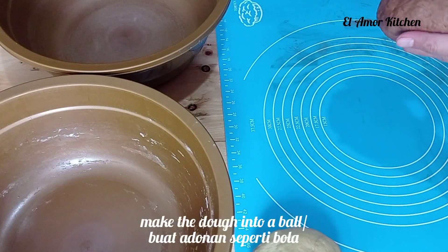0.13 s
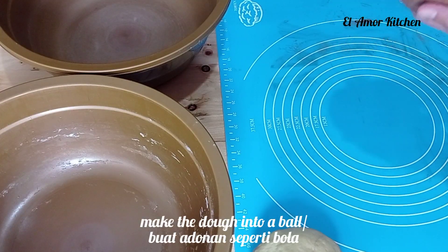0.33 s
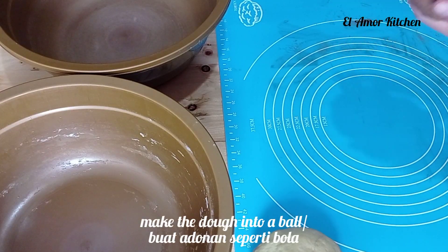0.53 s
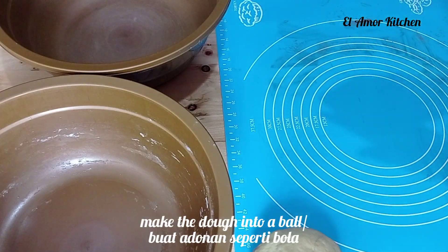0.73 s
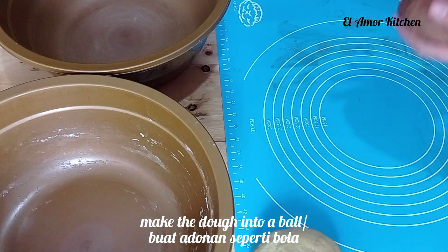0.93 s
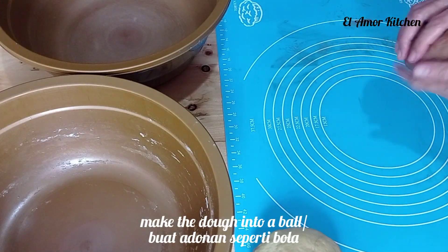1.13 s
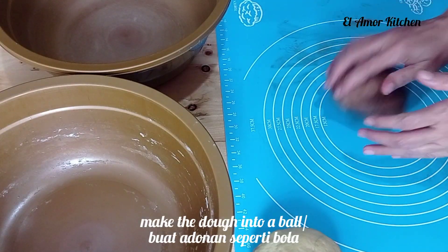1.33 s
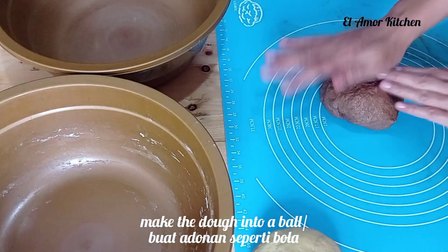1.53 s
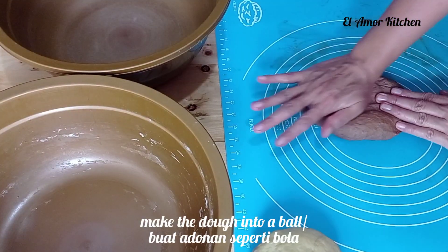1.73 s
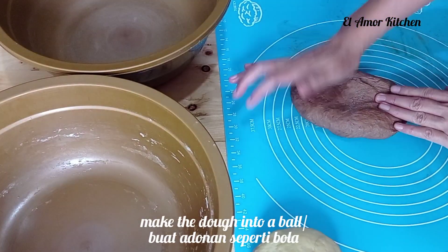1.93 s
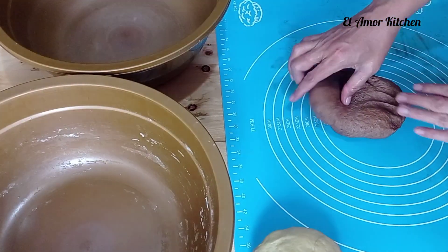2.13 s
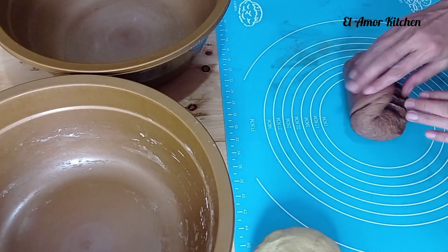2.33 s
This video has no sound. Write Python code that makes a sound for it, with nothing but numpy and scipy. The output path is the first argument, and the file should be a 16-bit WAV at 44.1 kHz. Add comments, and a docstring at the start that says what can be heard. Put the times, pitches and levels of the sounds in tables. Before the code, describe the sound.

Soft dough thuds onto a mat on a wooden table. Two small hand pats come first, and soft bumps and palm rubs follow, all heard from nearby in a slightly echoing kitchen with a faint appliance hum.

```python
"""A bare kitchen, where an appliance hums quietly. A ball of soft dough is patted twice between the hands,
dropped on a silicone mat on a wooden table, then pressed and folded. Impact makes the dough's wet skin
slap and sets the table thudding in its damped modes; friction of the palms gives hiss, crackle and
small squeaks. The room reverberates after the pats, the strokes and the drop."""
import sys
import numpy as np
from scipy import signal
from scipy.fft import rfft, irfft, next_fast_len
from scipy.io import wavfile
from scipy.ndimage import map_coordinates

SR = 44100
rng = np.random.default_rng(int(sys.argv[2]) if len(sys.argv) > 2 else 0)


def materialize(psi):
    """Save the field psi as 16-bit PCM at rate SR to the path in sys.argv[1].

    A 1-D psi becomes a single channel; in a 2-D psi each row is a channel.
    """
    bounded = np.clip(np.atleast_2d(psi).T, -1, 1)
    quanta = np.round(bounded * 32767).astype(np.int16)
    wavfile.write(sys.argv[1], SR, quanta)


N = 108794
T = np.arange(N) / SR


def amp(db):
    """Amplitude ratio of a level in decibels."""
    return 10 ** (np.asarray(db) / 20)


def unit(x):
    """Normalisation to rms 1."""
    return x / np.sqrt(np.mean(x ** 2) + 1e-20)


def along(points, hz):
    """Interpolation of (f, value) points on a log frequency axis."""
    f, values = np.transpose(points)
    return np.interp(np.log(hz + 1), np.log(f + 1), values)


def wobble(rate):
    """Smooth random modulation: a spline through rate knots a second."""
    return map_coordinates(rng.standard_normal(int(N * rate / SR) + 4), [T * rate])


def filtered(x, response):
    """Linear filtering: the spectrum of x times a frequency response."""
    size = next_fast_len(N + SR // 2)
    return irfft(rfft(x, size) * response(np.fft.rfftfreq(size, 1 / SR)), size)[:N]


def noise(spectrum):
    """Spectral shaping: coloured noise of rms 1."""
    return unit(filtered(rng.standard_normal(N), lambda hz: amp(along(spectrum, hz))))


def narrowband(hz, width):
    """Quadrature modulation: a noise band about hz, roughly width Hz wide."""
    return wobble(width) * np.sin(2 * np.pi * hz * T) + wobble(width) * np.cos(2 * np.pi * hz * T)


def burst(onset, rise, fall):
    """Exponential attack and decay, with time constants in seconds."""
    t = np.maximum(T - onset, 0)
    return (1 - np.exp(-t / rise)) * np.exp(-t / fall)


def swell(peak, rise, fall):
    """Gaussian envelope with its own width on each side of the peak."""
    return np.exp(-.5 * ((T - peak) / np.where(T < peak, rise, fall)) ** 2)


# Hum lines of the appliance: f/Hz, rms level/dB, modulation depth
HUM_LINES = [(147.2, -66.5, 0.27), (247, -84.5, 0.49), (494.7, -73.5, 0.44), (580, -89.5, 0.22)]
# Spectrum of the room's air: f/Hz, relative level/dB
AIR_SPECTRUM = [(15, -71), (25, -30), (91, -7), (119, -5.5), (160, -2), (340, -9), (399, -16.5), (495, -10),
                (552, -16.5), (1020, -28.5), (2420, -33), (2630, -35), (2850, -34.5), (3530, -40),
                (15500, -52.5)]

def background():
    """Random amplitude and phase modulation makes the hum waver over a broadband murmur of air."""
    hum = 0
    for hz, db, depth in HUM_LINES:
        modulation = 1 + depth * (wobble(22.16) + 1j * wobble(22))
        carrier = np.exp(2j * np.pi * (hz * T + rng.random()))
        hum += amp(db) * np.sqrt(2) * np.real(modulation * carrier)
    return hum + amp(-66.5 + 0.64 * wobble(10.54)) * noise(AIR_SPECTRUM)


# Contacts of hand and dough: t/s, level/dB, decay time/s, palm weight/dB
PAT_CONTACTS = [(.022, -60.5, 0.0016, 0), (0.911, -54, 0.0058, -19), (0.921, -44, 0.003, 4.5),
                (0.924, -37.5, .004, -7.5), (1.1106, -48, 0.0054, -23), (1.113, -38.5, 0.0024, -18),
                (1.129, -49, 0.0039, -10)]
# Spectra of the skin's smack and the cupped palm: f/Hz, relative level/dB
SMACK_SPECTRUM = [(40, -38), (150, -36), (500, 0.5), (900, -7), (1600, -2.5), (2300, -5), (2900, -4),
                  (4400, -0.5), (6800, -2), (9000, -7.5), (11000, -20.5), (13500, -29), (15500, -18)]
PALM_SPECTRUM = [(40, -45), (100, -18), (250, -11.5), (370, 2.5), (470, 6.5), (600, -11.5), (900, -15.5),
                 (4000, -53)]

def pats():
    """Impact of skin on dough gives a short smack; cavity resonance of the palm adds a hollow note."""
    smack_power = sum((amp(db) * burst(s, 0.00059, decay)) ** 2 for s, db, decay, _ in PAT_CONTACTS)
    hollow = sum(amp(db + palm_db) * burst(s, 0.0019, 0.0047) for s, db, _, palm_db in PAT_CONTACTS)
    smack = contact(np.sqrt(smack_power), SMACK_SPECTRUM, wet_db=-1.5, build_s=.002)
    return smack + contact(amp(-1.5) * hollow, PALM_SPECTRUM, wet_db=2.0, build_s=.004)


def contact(envelope, spectrum, wet_db, build_s):
    """Superposition of a contact's direct noise and its reverberant field."""
    return envelope * noise(spectrum) + kitchen(envelope, spectrum, wet_db, build_s)


# Reverberation time of the kitchen: f/Hz, T60/s
KITCHEN_T60 = [(100, 0.63), (250, 0.94), (1000, 0.75), (4000, 0.54), (7000, 0.49), (10000, .45),
               (15000, 0.43)]
RIPPLE_DB, RIPPLE_HZ = 2.5, 70  # depth and spacing of the colour from crowded room modes

def kitchen(envelope, spectrum, wet_db, build_s):
    """Reverberation: diffuse energy builds up, then decays exponentially at each frequency's own rate."""
    ripple_db = RIPPLE_DB * rng.standard_normal(SR // RIPPLE_HZ)
    wash = filtered(noise(spectrum), lambda hz: amp(map_coordinates(ripple_db, [hz / RIPPLE_HZ], order=1)))
    hz, t, frames = signal.stft(unit(wash), SR, nperseg=256)
    frame_index = np.ceil(T / t[1]).astype(int)
    power_in = np.bincount(frame_index, envelope ** 2, len(t)) / (SR * t[1])
    t60 = along(KITCHEN_T60, hz)[:, None]
    response = amp(-60 * t / t60) ** 2 * (1 - np.exp(-t / build_s))
    response /= response.sum(axis=1).max()
    energy = signal.fftconvolve(power_in[None], response, axes=1)[:, :len(t)]
    return amp(wet_db) * signal.istft(frames * np.sqrt(np.abs(energy)), SR, nperseg=256)[1][:N]


# Palm strokes over dough and mat: peak t/s, level/dB, rise/s, fall/s
STROKES = [(0.15, -70, 0.009, 0.0084), (0.351, -86, 0.036, 0.034), (0.511, -76, 0.013, 0.017),
           (0.679, -78.5, 0.036, 0.043), (0.787, -73, 0.016, 0.0088), (1.26, -76.5, 0.019, 0.1),
           (1.73, -77, .015, 0.022), (1.795, -81, 0.018, 0.043), (1.92, -72.5, 0.007, 0.0079),
           (1.956, -63.5, .014, 0.027), (2.21, -78.5, 0.028, 0.036), (2.289, -83, 0.022, 0.039)]
# Spectrum of the friction: f/Hz, relative level/dB
FRICTION_SPECTRUM = [(300, -14.5), (1000, -9), (2000, -6.5), (4000, -7.5), (5200, -3.5), (6500, 1),
                     (8000, -4.5), (10000, -12.5), (13000, -35), (15500, -15)]

def rubs():
    """Sliding friction hisses under each stroke; adhesion breaks in tiny crackles as skin comes unstuck."""
    envelope = sum(amp(db) * swell(s, rise, fall) for s, db, rise, fall in STROKES)
    snaps = (rng.random(N) < 500 / SR) * rng.standard_normal(N)  # about 500 a second
    crackle = unit(filtered(snaps, lambda hz: amp(along(FRICTION_SPECTRUM, hz))))
    friction = unit(noise(FRICTION_SPECTRUM) + amp(-0.5) * crackle)
    return envelope * friction + kitchen(envelope, FRICTION_SPECTRUM, wet_db=-7, build_s=.004)


# Faint high tones: f/Hz, relative level/dB
RING_TONES = [(680, 1), (1200, -6.5), (1750, -4.5), (1950, -8.5), (2870, -3), (4000, -6.5), (5240, -7)]
# Their common envelope: t/s, level/dB
RING_ENVELOPE = [(0, -100), (.6, -89), (.78, -85.5), (1.1, -84), (1.33, -75), (1.6, -95.5), (2, -82.5),
                 (2.47, -94)]

def ring():
    """Narrow-band noise is heard as fuzzy tones hanging in the room while the dough is handled."""
    tones = sum(amp(db) * narrowband(hz, width=110) for hz, db in RING_TONES)
    return tones * amp(np.interp(T, *np.transpose(RING_ENVELOPE)))


# Slips of skin on tacky dough: peak t/s, f/Hz, level/dB, half-width/s
SLIPS = [(0.697, 4720, -83.5, 0.025), (2.069, 1364, -69.5, 0.0051), (2.2, 1506, -78.5, 0.032)]

def squeaks():
    """Stick-slip oscillation of the skin gives a brief, rough pitch."""
    return sum(amp(db) * swell(s, span, span) * narrowband(hz, width=320) for s, hz, db, span in SLIPS)


# Spectra of the dough's first touch, spreading skin and flattening bulk: f/Hz, relative level/dB
CRACK_SPECTRUM = [(40, -40.5), (150, -19), (400, 17), (1000, 1), (1900, 5.5), (3000, -2.5), (4500, -20),
                  (6000, -5), (8000, -25), (11000, -24), (15500, -43)]
SLAP_SPECTRUM = [(200, 1.5), (600, 7.5), (1000, 0.5), (1250, 5), (1600, -2.5), (2100, -5.5), (2800, -1.5),
                 (3200, -5.5), (3900, 7), (4400, 1), (5000, -4), (6400, -1), (8000, -13.5), (10000, -23),
                 (13000, -54), (15500, -41)]
PUSH_SPECTRUM = [(30, -53), (70, -32), (120, -10), (190, 5), (400, -6.5), (650, -12), (850, -12.5),
                 (1000, -29), (1250, -15.5), (3000, -55), (8000, -76)]
DROP_S, LOW_CUT_HZ = 1.388, 59  # the thud and push are high-passed at this frequency

def drop():
    """Inelastic impact: the dough lands with a crack, a wet slap and a dull push, and the table rings."""
    crack = amp(-33) * swell(DROP_S + 0.0016, 0.002, 0.0022) * noise(CRACK_SPECTRUM)
    slap = contact(amp(-36) * burst(DROP_S, 0.00098, 0.0062), SLAP_SPECTRUM, wet_db=8, build_s=.001)
    flattening = amp(-25.5) * burst(DROP_S + 0.00086, 0.0015, 0.012)
    push = contact(flattening, PUSH_SPECTRUM, wet_db=-2, build_s=0.0076)
    thud = push + amp(-27.5) * table(DROP_S, dull_db=0.5, damping=0.96)
    low_cut = signal.butter(3, LOW_CUT_HZ, "high", fs=SR, output="sos")
    return crack + slap + signal.sosfilt(low_cut, thud)


# Modes of table and room: f/Hz, relative level/dB, T60/s at damping 1
TABLE_MODES = [(93, 0.5, 0.33), (121, -3.5, 0.44), (144, 0.5, 0.16), (165.6, -5, 0.71), (222, -9, 0.21),
               (242.8, -9.5, 0.64), (301, -7.5, 0.28), (338, -8, 0.34), (360.6, -10.5, 0.27),
               (411.4, -10.5, 0.34), (541, -17, .37), (623, -10, 0.28), (792, -17.5, 0.53),
               (900, -19.5, 0.52)]
BUILD_CYCLES = 0.26  # attack time constant of each mode, in periods

def table(onset, dull_db, damping):
    """Free vibration of damped modes after a blow; a soft blow loses dull_db an octave."""
    start = round(onset * SR)
    t = T[:min(N - start, SR)]
    drift = wobble(30)
    modes = 0
    for k, (hz, db, t60) in enumerate(TABLE_MODES):
        octaves = np.log2(hz / TABLE_MODES[0][0])
        level_db = db + rng.normal(0, 1) - dull_db * octaves - 60 * damping * t / t60
        attack = 1 - np.exp(-t * hz / BUILD_CYCLES)
        phase = k * np.pi + 0.47 * np.roll(drift, k * SR // 10)[:len(t)]  # alternating sign, slow wander
        modes += amp(level_db) * attack * np.sin(2 * np.pi * hz * t + phase)
    return np.pad(modes, (start, N - start - len(t)))


# The hand leaning on the dough: t/s, level/dB
HAND_PRESSES = [(1.695, -61.5), (1.836, -62.5), (1.924, -54.5), (1.95, -48), (2.034, -56), (2.099, -57.5)]

def presses():
    """Contact damping: the hand's weight bumps the table softly and shortens its ringing."""
    return sum(amp(db) * table(s, dull_db=1.5, damping=1.53) for s, db in HAND_PRESSES)


def scene():
    """Linear superposition of all sources at one point above the table."""
    return (drop() + pats() + rubs() + squeaks() + presses() + ring() + background())[None]


TOP_HZ = 15850

def record(dry):
    """Band limiting: an ideal low-pass filter passes nothing above TOP_HZ."""
    return np.array([filtered(channel, lambda hz: hz < TOP_HZ) for channel in dry])


dry = scene()
out = record(dry)
materialize(out)
```